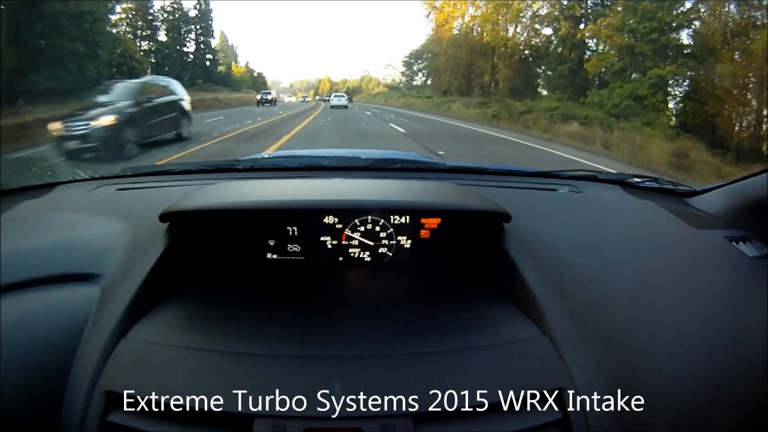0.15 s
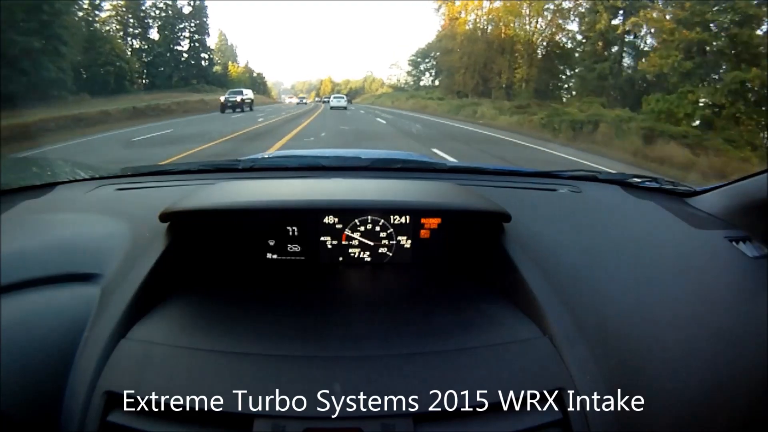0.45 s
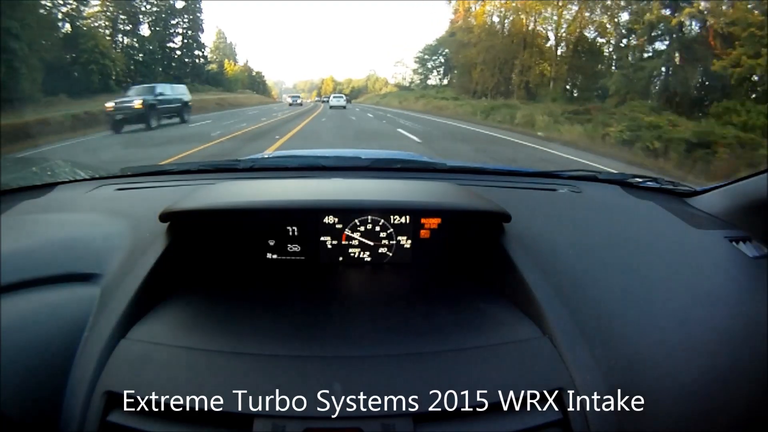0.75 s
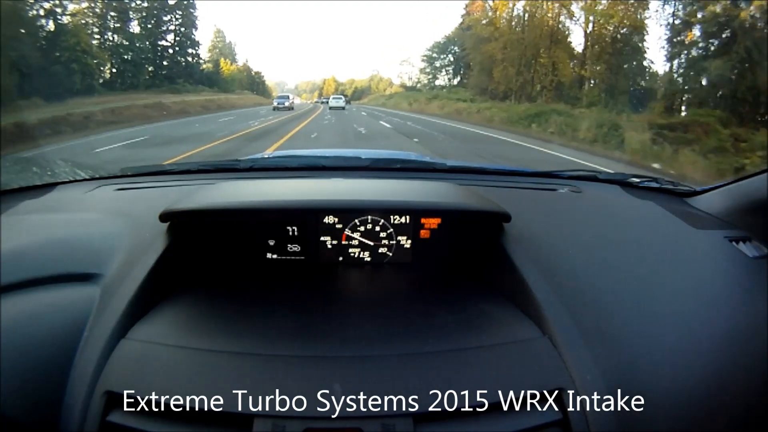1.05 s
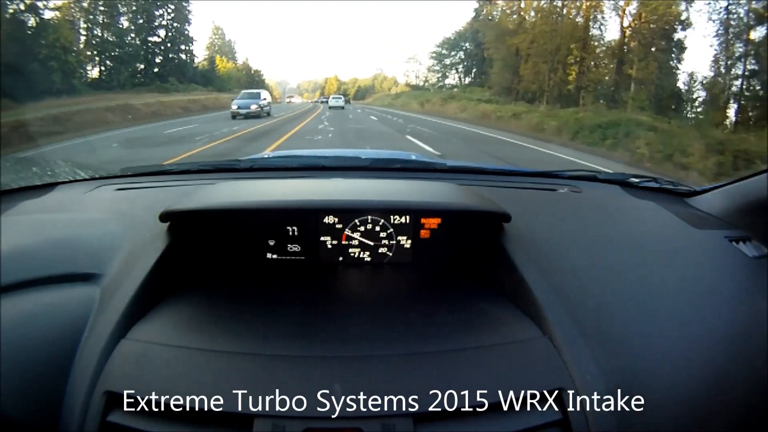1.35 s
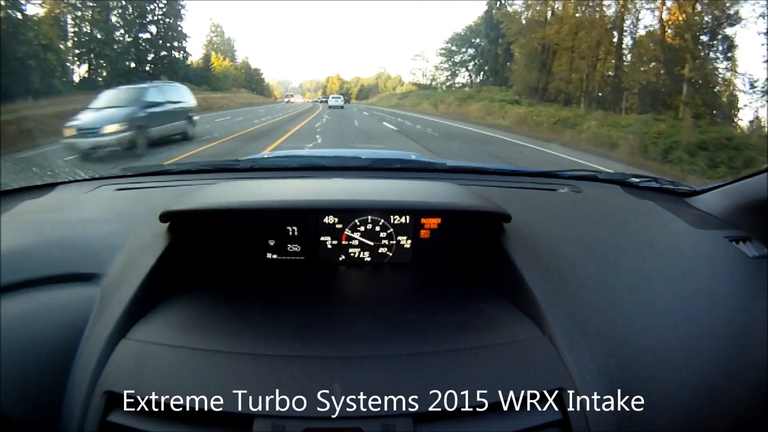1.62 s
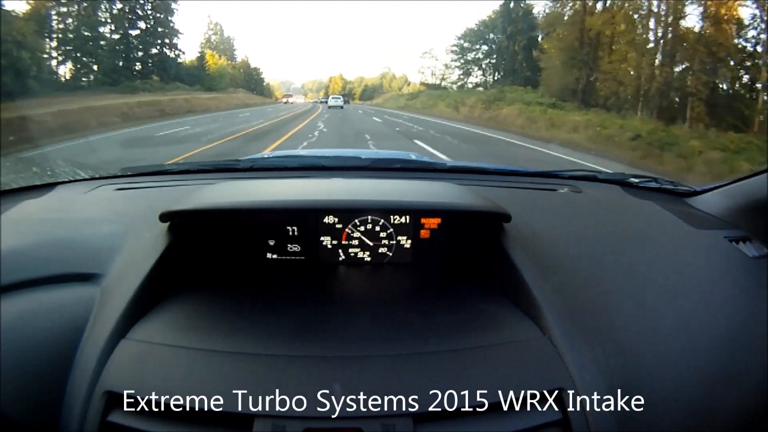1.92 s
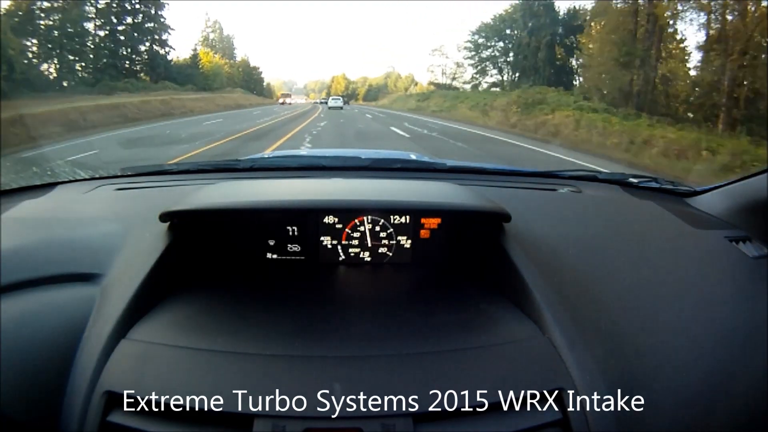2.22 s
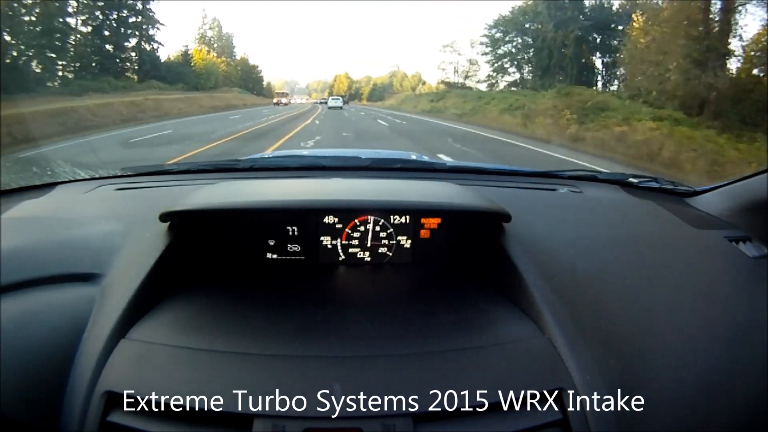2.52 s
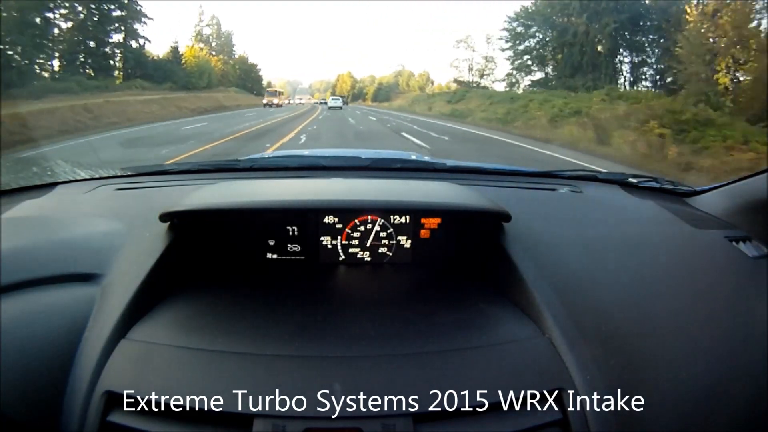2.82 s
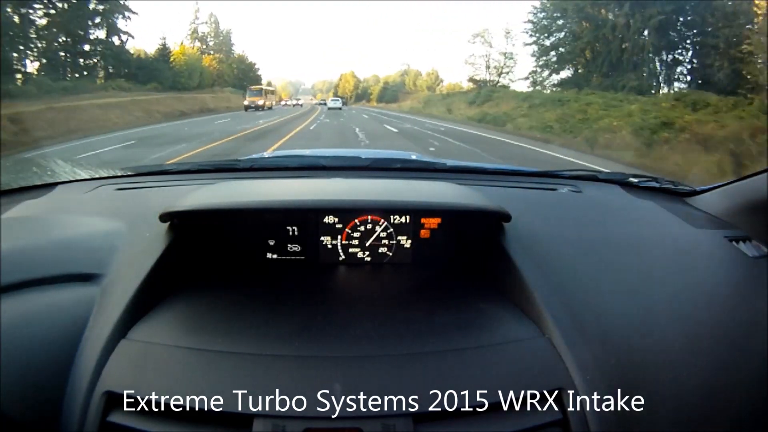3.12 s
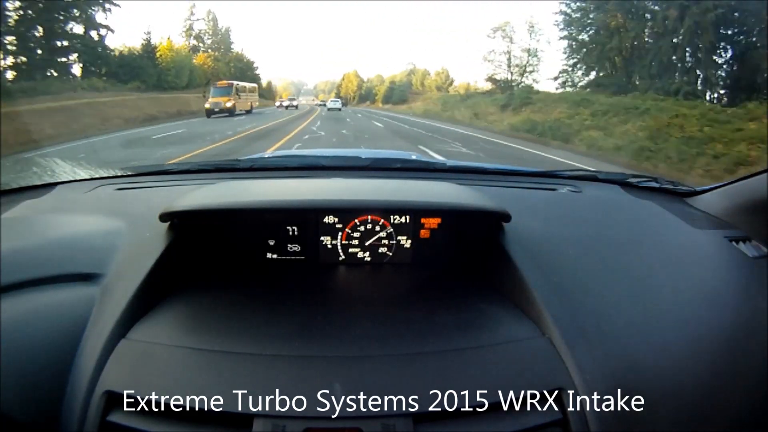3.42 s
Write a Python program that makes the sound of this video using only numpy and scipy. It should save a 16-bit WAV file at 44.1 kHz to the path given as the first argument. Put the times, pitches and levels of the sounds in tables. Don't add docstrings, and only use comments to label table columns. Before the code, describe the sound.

A car engine drones low and steady inside a closed cabin at highway speed, over booming tyre rumble and soft road roar. Around 1.6 to 1.8 s the throttle opens: the drone thickens and intake air puffs briefly. From about 2.3 s the hiss swells, brightening with breathy whistles to the end near 3.5 s as engine pitch rises slightly. A small camera microphone adds gritty highs and faint ticks, mostly earlier.

```python
import sys
import numpy as np
from scipy import signal
from scipy.io import wavfile

SR = 44100
rng = np.random.default_rng(int(sys.argv[2]) if len(sys.argv) > 2 else 0)


def dump_mix(stems):
    frames = np.atleast_2d(stems).T
    limited = np.clip(frames, -1, 1)
    pcm = np.round(limited * 32767).astype(np.int16)
    wavfile.write(sys.argv[1], SR, pcm)


def volts(x):
    e = np.asarray(x, float) / 20
    return 10 ** e


N = 156996
TIME_S = np.arange(N) / SR

# start_s, firing_hz, firing_tone_db, load_db (level of the second firing harmonic)
ENGINE_RUN = [(0, 79.5, -16, -23), (.5, 79.47, -18.5, -38), (1.0, 78.44, -19, -32.5),
              (1.54, 77.98, -16, -31), (1.62, 78.34, -20, -22.5), (1.9, 78.2, -18.5, -21.5),
              (2.3, 78.94, -18.5, -20), (2.7, 80.62, -18.5, -19.5), (3.1, 82.9, -19, -21.5),
              (3.4, 85.43, -18, -23.5), (3.56, 86.2, -12.5, -25)]


def in_time(rows):
    start_s, *columns = np.transpose(rows)
    return [np.interp(TIME_S, start_s, column) for column in columns]


def rise(middle_s, width_s):
    return 1 / (1 + np.exp((middle_s - TIME_S) / width_s))


def rms_one(x):
    return x / np.sqrt(np.mean(x ** 2) + 1e-20)


def drift(rate_hz):
    pole = np.exp(-80 * np.pi * rate_hz / SR)
    white = rng.standard_normal(N // 40 + 2002)
    slow = signal.lfilter([1], [1, -2 * pole, pole * pole], white)[2000:]
    return np.interp(np.arange(N) / 40, np.arange(len(slow)), rms_one(slow))


def banded_noise(spectrum, shared_db, own_db, rate_hz):
    hz, db = np.transpose(spectrum)
    count = int(3 * np.log2(hz[-1] / hz[0])) + 2
    edges_hz = np.geomspace(hz[0] / 1.1, min(hz[-1], 5900), count)
    white = rng.standard_normal((2, N + 8000))
    out = 0
    for k, (low, high) in enumerate(zip(edges_hz, edges_hz[1:])):
        sos = signal.butter(3, [low, high], "band", fs=SR, output="sos")
        band = signal.sosfilt(sos, white[k % 2])[8000:]
        level_db = np.interp(np.log(low * high) / 2, np.log(hz), db)
        out = out + volts(level_db + own_db * drift(rate_hz)) * band
    return rms_one(out * volts(shared_db * drift(rate_hz)))


def resonate(x, peaks):
    for hz, width_hz, db in peaks:
        b, a = signal.iirpeak(hz, hz / width_hz, fs=SR)
        x = x + (volts(db) - 1) * signal.lfilter(b, a, x)
    return rms_one(x)


def firing_phase():
    wobble_hz = 0.35
    firing_hz = in_time(ENGINE_RUN)[0] + wobble_hz * drift(2.7)
    return 2 * np.pi * np.cumsum(firing_hz) / SR


def engine(phase):
    # multiple (of firing rate), level_db (against the firing tone)
    side_orders = [(0.5, -16.5), (1.5, -23.5), (2.5, -23.5), (3.0, -31.5), (4.0, -25.5), (6.0, -24.5)]
    uneven_db = 1.4
    hz, tone_db, load_db = in_time(ENGINE_RUN)
    coast_rad, load_rad, slip_rad_per_hz = -1.3, 1.15, -.22
    loaded = rise(1.62, 0.038)
    lead_rad = coast_rad + loaded * (load_rad - coast_rad + slip_rad_per_hz * (hz - hz.min()))
    out = volts(tone_db + uneven_db * drift(19.0)) * np.cos(phase)
    out += volts(load_db + uneven_db * drift(11.0)) * np.cos(2 * phase + lead_rad)
    for multiple, db in side_orders:
        level = volts(tone_db + db + 3.0 * drift(8.1))
        out += level * np.cos(multiple * phase + rng.uniform(0, 5.1))
    return np.sqrt(2) * out


def road():
    # start_s, level_db
    road_level = [(0, -39.5), (.12, -43), (.27, -47), (.4, -43), (.79, -45), (.95, -43), (1.1, -45),
                  (1.32, -43), (1.55, -44.5), (1.8, -42.5), (1.92, -49), (2.0, -44.5), (2.5, -49),
                  (2.66, -42), (2.77, -49), (2.93, -44), (3.26, -48), (3.37, -45)]
    # pitch_hz, density_db_per_hz
    roar_spectrum = [(200, 0), (450, -5.5), (700, -15.5), (1300, -22.5), (2200, -32), (3300, -40),
                     (4200, -45.5), (5800, -56.5)]
    # pitch_hz, density_db_per_hz
    rumble_spectrum = [(22, -9.5), (35, -5), (50, 1), (63, -6), (110, 5.5), (140, -1.5), (200, -6.5),
                       (300, -30.5)]
    # pitch_hz, width_hz, lift_db
    cabin = [(50, 18, 6.0), (290, 30, 3.0), (395, 30, 2.5), (476, 45, 6.0), (600, 60, 4.0), (833, 40, 3.0),
             (930, 40, 3.0), (1215, 75, 6.5), (1630, 70, 4.0), (3050, 500, 5.0)]
    roar_over_db, split_hz, roar_low_follows = 14.5, 750, .4
    rumble_db, rumble_follows, rumble_eases_db = -20.5, 0.24, -3.0
    db, = in_time(road_level)
    swing_db = db - db.mean()

    roar = resonate(banded_noise(roar_spectrum, shared_db=1.5, own_db=1.0, rate_hz=25.0), cabin[1:])
    low = signal.sosfiltfilt(signal.butter(2, split_hz, fs=SR, output="sos"), roar)
    high = roar - low
    roar = volts(db + roar_over_db) * (high + volts((roar_low_follows - 0.5) * swing_db) * low)

    rumble = resonate(banded_noise(rumble_spectrum, shared_db=1.2, own_db=1.2, rate_hz=12.0), cabin[:1])
    eased_db = rumble_eases_db * rise(1.9, .1)
    return roar + volts(rumble_db + eased_db + rumble_follows * swing_db) * rumble


def intake(phase):
    # start_s, level_db
    air_flow = [(1.45, -70), (1.56, -63), (1.61, -51), (1.7, -57), (1.8, -51.5), (1.86, -63), (1.95, -66),
                (2.3, -56.5), (2.55, -53), (2.67, -50), (2.77, -54), (2.95, -49.5), (3.03, -53.5),
                (3.2, -50), (3.27, -53.5), (3.34, -49.5), (3.45, -50.5), (3.56, -49.5)]
    # pitch_hz, density_db_per_hz
    hiss_spectrum = [(900, -18), (1500, 6.5), (2400, -7), (3300, -1.5), (4000, -15), (4500, -11.5),
                     (5200, -14.5), (5800, -28.5)]
    # pitch_hz, width_hz, lift_db
    duct = [(1210, 50, 10.0), (1700, 80, 4.0), (2760, 40, 5.0), (2950, 80, 5.0), (3280, 150, 5.0),
            (3590, 70, -12.0), (3750, 150, 6.0), (4125, 50, -8.0), (4220, 60, 7.0), (4900, 500, 5.0)]
    hiss_over_db, floor_db = 2, -63.5
    pulsing, pulsing_phase_rad = .08, .9
    bright_hz, before_db, after_db = 4160, -8.5, 3
    flow = np.sqrt(np.maximum(volts(in_time(air_flow)[0]) ** 2 - volts(floor_db) ** 2, 0))
    hiss = resonate(banded_noise(hiss_spectrum, shared_db=2.5, own_db=2.0, rate_hz=67.0), duct)
    high = signal.sosfiltfilt(signal.butter(4, bright_hz, "high", fs=SR, output="sos"), hiss)
    bright_db = before_db + rise(2.5, .12) * (after_db - before_db)
    hiss = hiss + (volts(bright_db) - 1) * high
    pulsed = hiss * (1 + pulsing * np.cos(phase + pulsing_phase_rad))
    return volts(hiss_over_db) * flow * (pulsed + whistles())


def whistles():
    # pitch_hz, width_hz, level_db (against the flow), start_s
    tones = [(1212, 70, -3, 2.5), (4000, 45, -13, 2.25), (3232, 70, -9, 2.4), (3403, 50, -10, 2.4),
             (3700, 45, -16, 2.5), (2926, 45, -16, 2.5), (5070, 45, -24, 2.6), (4736, 30, -27, 2.7)]
    out = 0
    for hz, width_hz, db, start_s in tones:
        b, a = signal.iirpeak(hz, hz / width_hz, fs=SR)
        once = signal.lfilter(b, a, rng.standard_normal(N))
        tone = rms_one(signal.lfilter(b, a, once))
        out = out + volts(db + 2.0 * drift(7.0)) * tone * rise(start_s, 0.051)
    return out


def ticks():
    # start_s, peak_db
    gain_steps = [(0.0922, -54), (0.1196, -54), (0.1506, -58), (0.164, -55), (0.1885, -47), (0.2139, -49),
                  (0.2693, -59), (0.4374, -51), (0.5711, -53), (0.608, -59), (0.6794, -53), (0.7053, -56),
                  (0.7617, -54), (0.8889, -56), (0.9707, -55), (1.0365, -56), (1.2176, -59), (1.3513, -58),
                  (1.4157, -49), (1.5035, -58), (1.6541, -55), (1.7973, -55), (1.8048, -51), (1.8692, -52),
                  (1.9106, -56), (2.0777, -55), (2.1251, -54), (2.2134, -56), (2.6429, -50)]
    small_per_s, small_db = 22, -66
    over_db, decay_s, ragged = 22.5, .0003, .1
    start_s, peak_db = np.transpose(gain_steps)
    small = rng.random(N) < small_per_s / SR
    marks = small * volts(small_db + 3.0 * rng.standard_normal(N))
    marks[((start_s + .001) * SR).astype(int)] = volts(peak_db)
    fade = signal.lfilter([1], [1, -np.exp(-1 / (decay_s * SR))], marks + 1e-18)
    return volts(over_db) * fade * (1 + ragged * rng.standard_normal(N))


def scene():
    phase = firing_phase()
    return (engine(phase) + road() + intake(phase) + ticks())[None]


def low_pass(x):
    return signal.sosfilt(signal.butter(12, 15250, fs=SR, output="sos"), x)


def record(dry):
    knee, guard_hz = 1.2, 5940
    rounded = knee * np.tanh(dry / knee)
    guarded = signal.sosfilt(signal.butter(8, guard_hz, fs=SR, output="sos"), rounded)
    slow = signal.resample_poly(guarded, 40, 147, axis=1)
    stairs = np.repeat(slow, 4, axis=1)
    held = signal.resample_poly(stairs, 147, 160, axis=1)[:, :N]
    return low_pass(held)


dry = scene()
out = record(dry)
dump_mix(out)
```